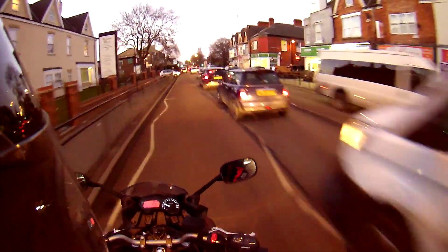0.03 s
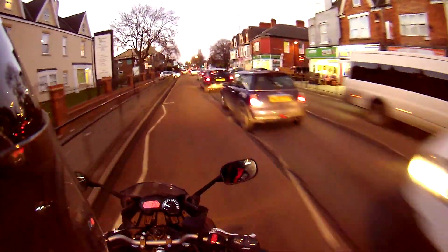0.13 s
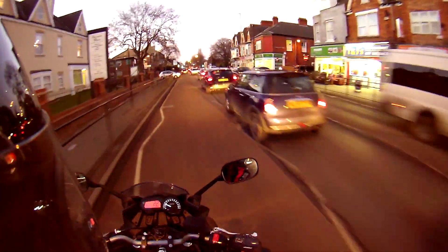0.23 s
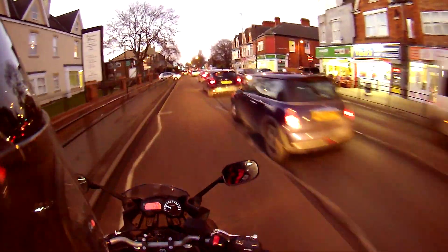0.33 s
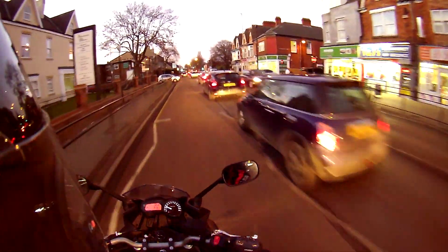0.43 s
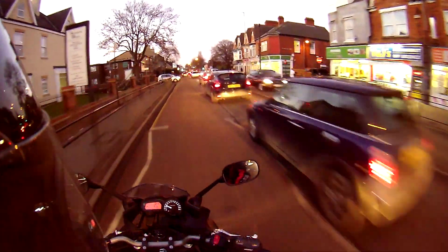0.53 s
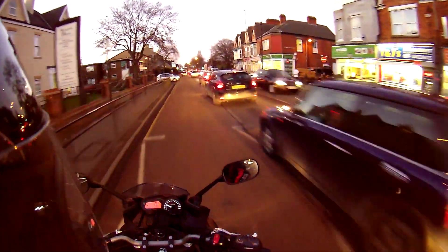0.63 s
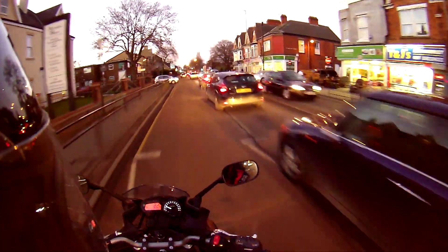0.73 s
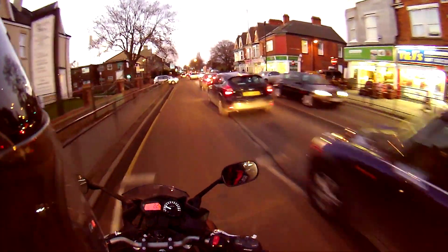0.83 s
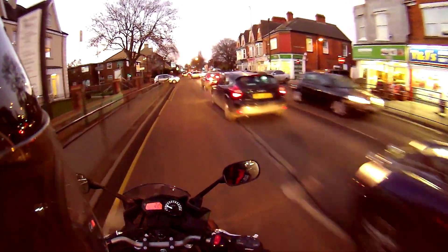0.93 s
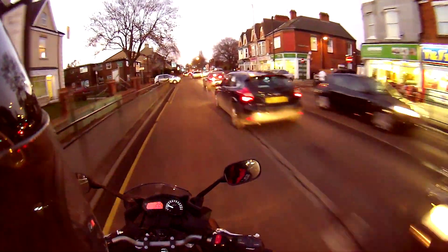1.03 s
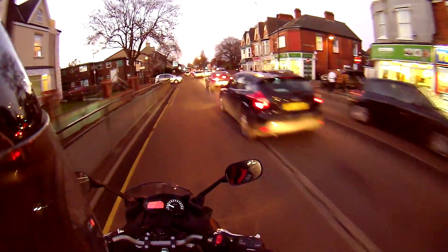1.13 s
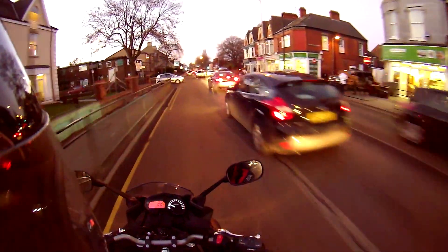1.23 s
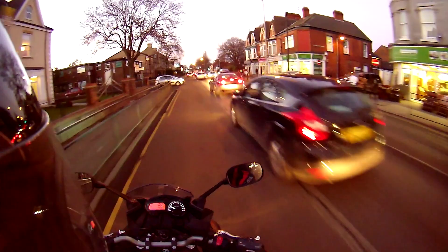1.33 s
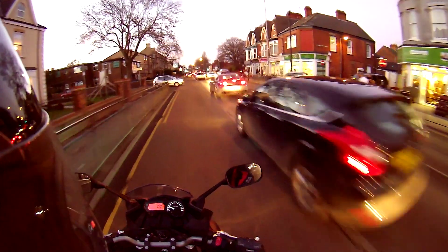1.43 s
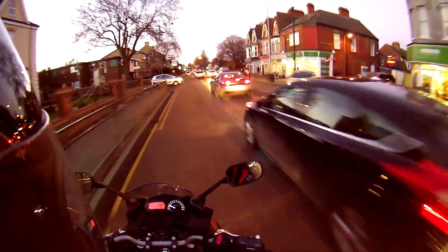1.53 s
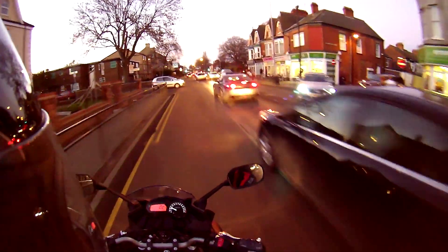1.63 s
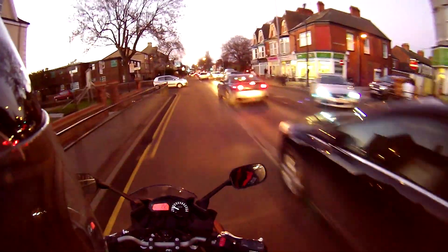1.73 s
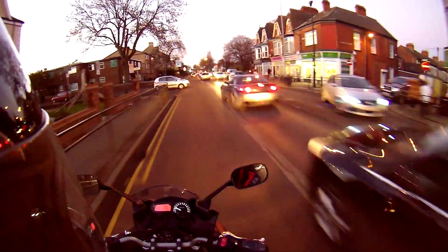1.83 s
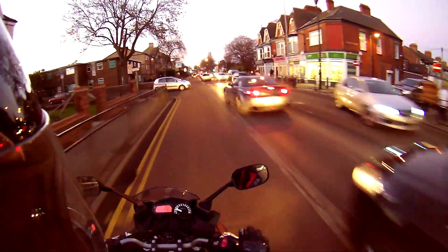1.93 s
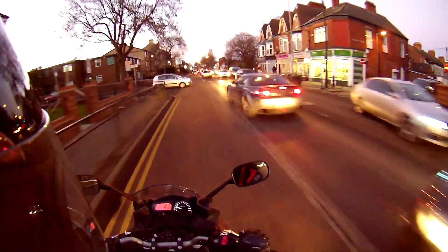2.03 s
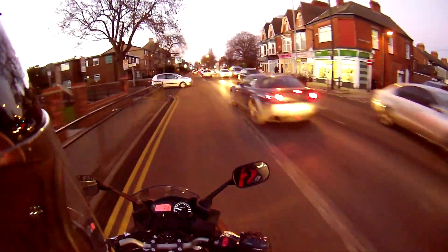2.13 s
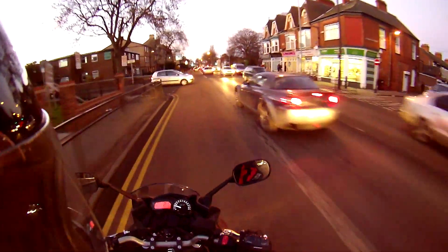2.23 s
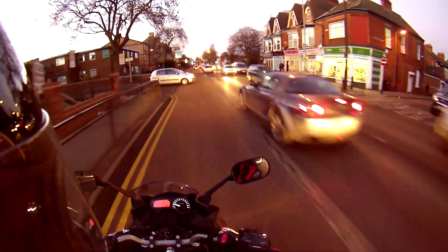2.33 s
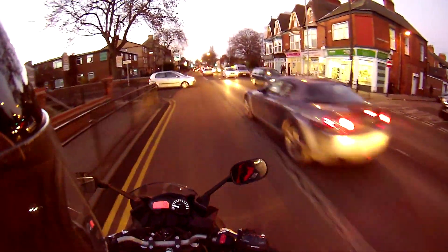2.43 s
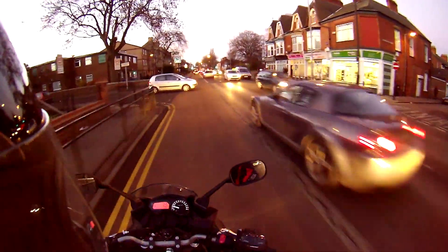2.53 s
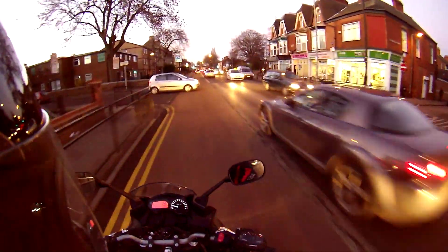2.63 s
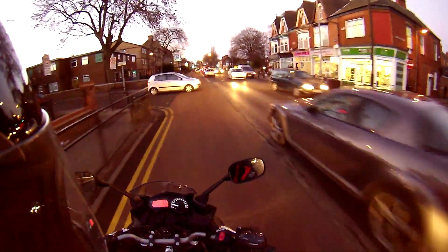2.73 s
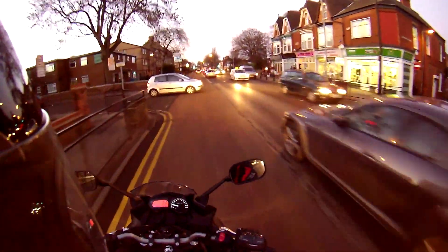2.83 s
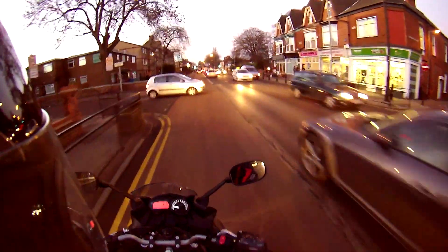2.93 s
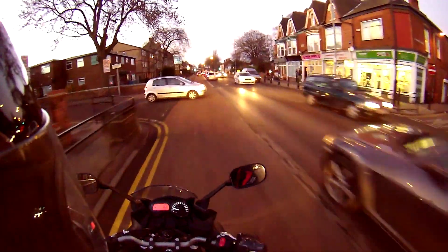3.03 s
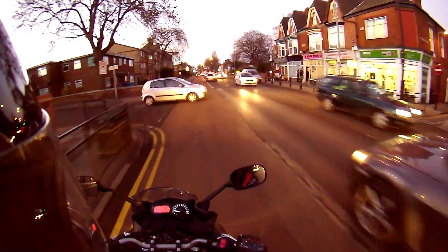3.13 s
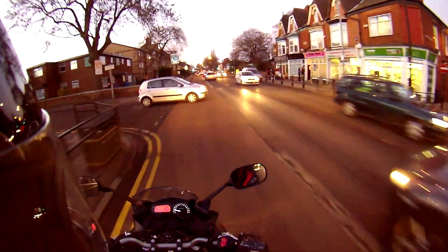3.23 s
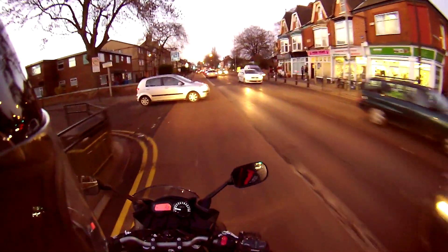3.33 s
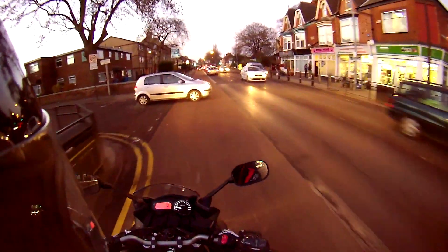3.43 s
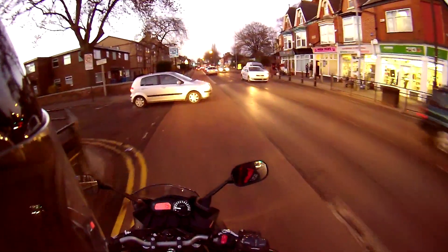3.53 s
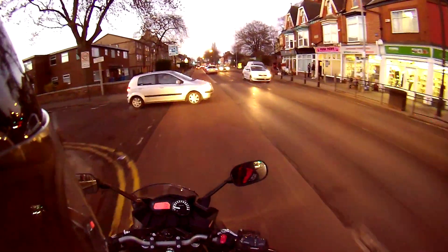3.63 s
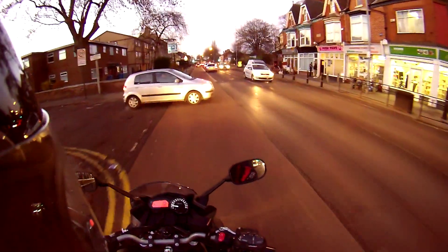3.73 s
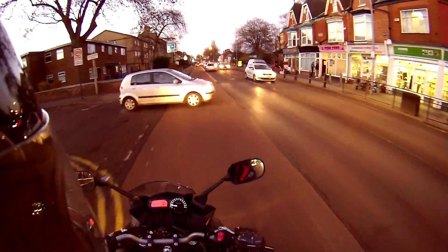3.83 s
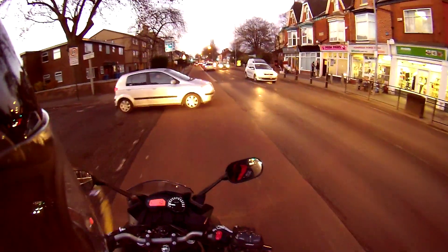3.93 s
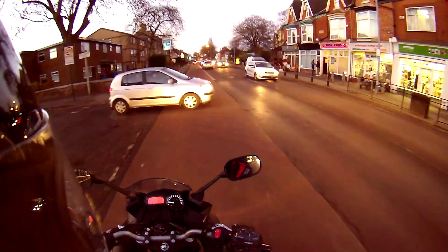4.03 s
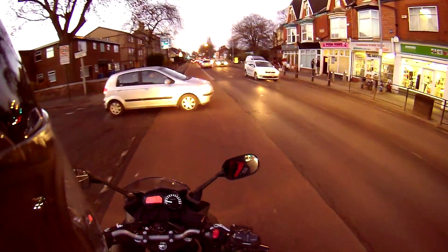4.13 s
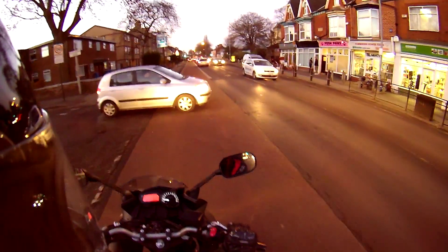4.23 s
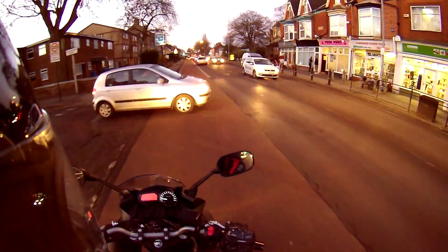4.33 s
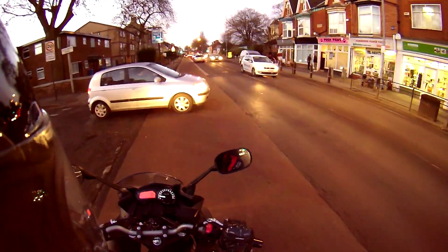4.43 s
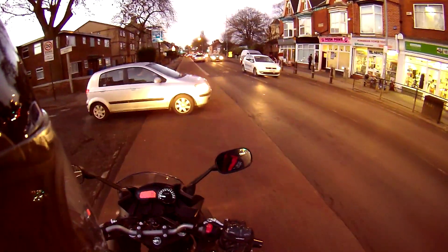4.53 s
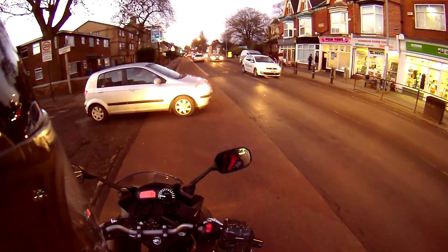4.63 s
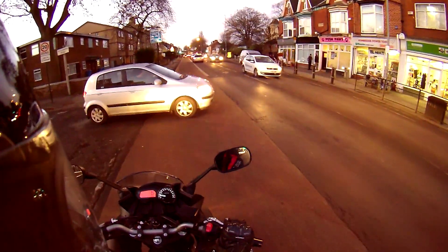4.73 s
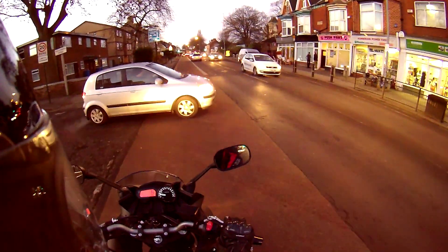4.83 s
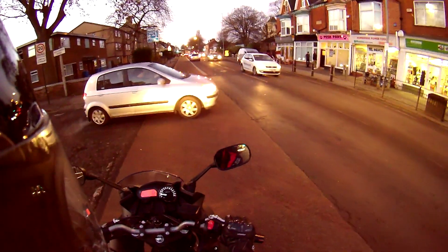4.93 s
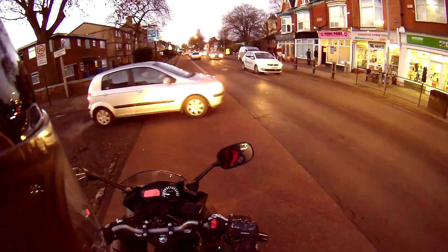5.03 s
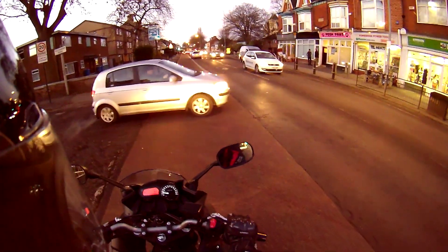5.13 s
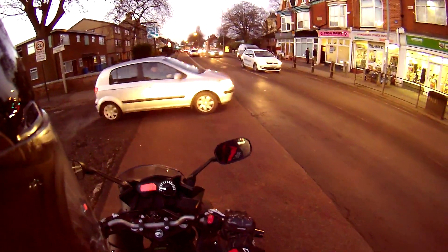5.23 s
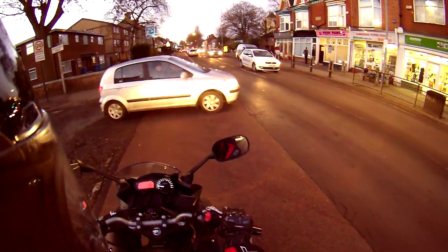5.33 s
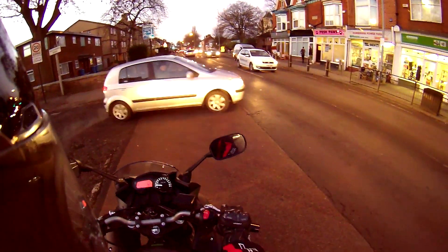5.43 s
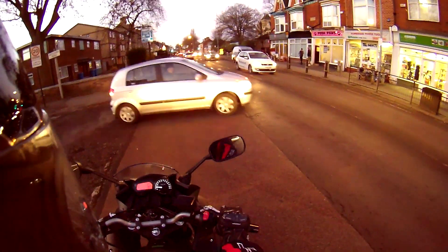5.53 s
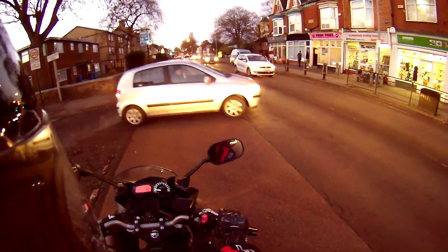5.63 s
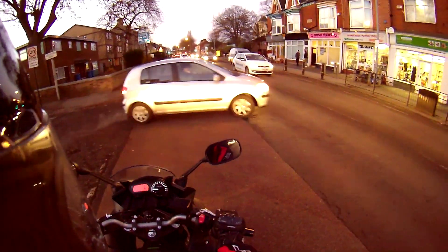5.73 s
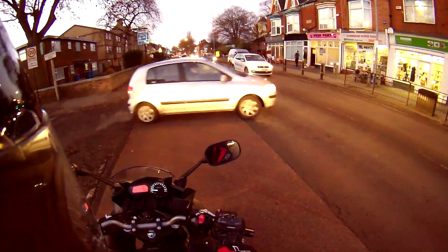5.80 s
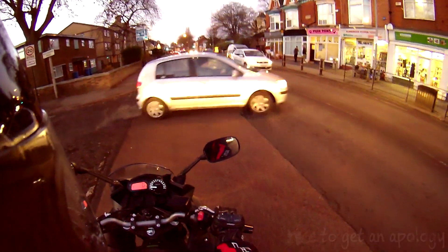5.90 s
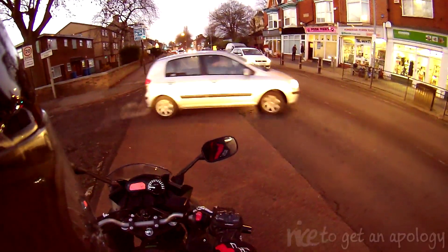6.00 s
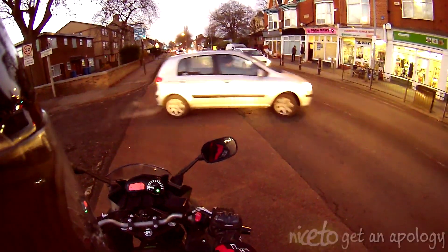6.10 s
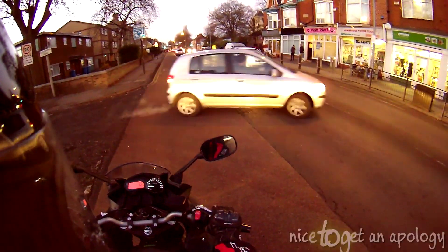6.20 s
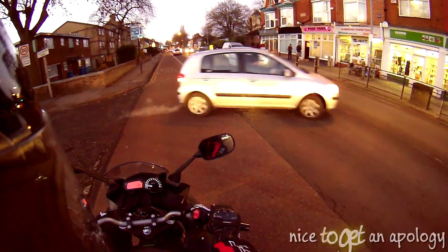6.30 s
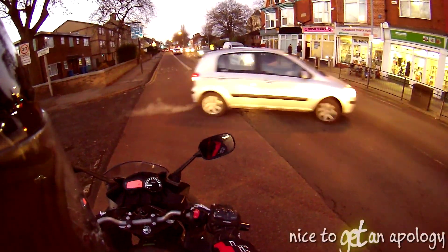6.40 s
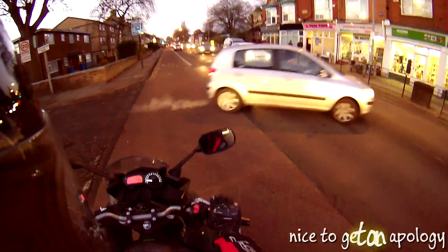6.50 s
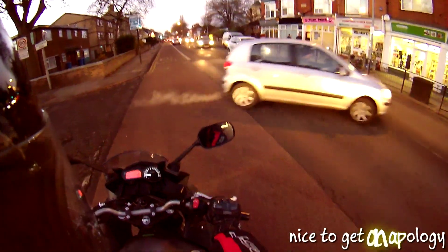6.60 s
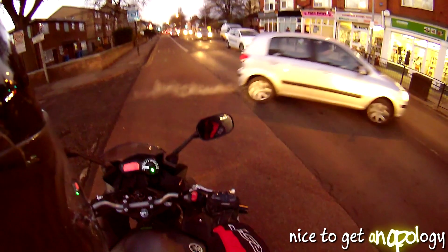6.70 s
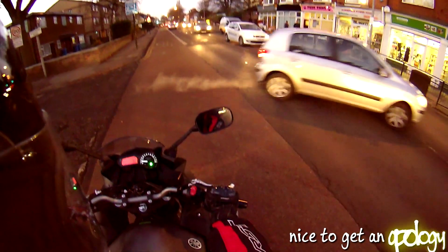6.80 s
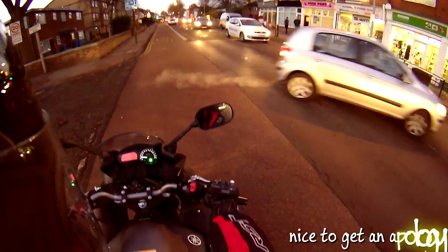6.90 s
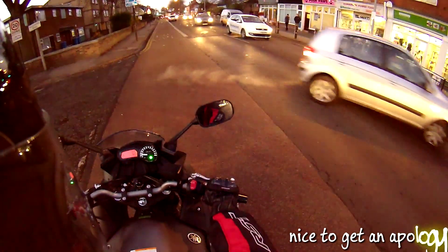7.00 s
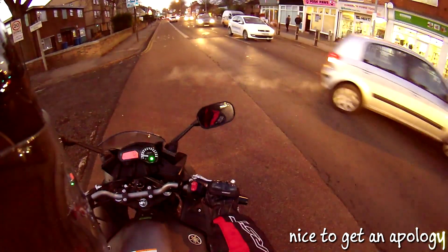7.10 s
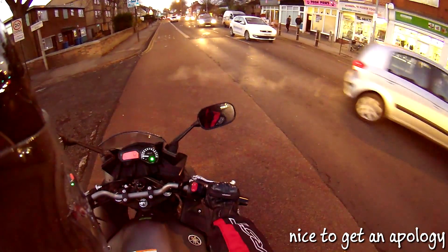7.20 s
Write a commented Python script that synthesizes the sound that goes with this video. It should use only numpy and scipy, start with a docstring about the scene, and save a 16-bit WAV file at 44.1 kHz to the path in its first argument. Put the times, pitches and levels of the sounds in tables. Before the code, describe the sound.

Wind rumbles over a running motorcycle engine; its horn blares for a second, and the engine sinks to a steady idle.

```python
"""Motorcycle and horn in town

A four-cylinder motorcycle passes a line of cars, heard from the rider's helmet: firing pulses drive
exhaust, casing and air box, the chain hums and the tyres roar. The rider shuts the throttle and sounds
the disc horn, a hammered diaphragm, for a second at a car that pulls out ahead. Turbulent wind buffets
the microphone until the bike slows; the engine sinks to idle, with a brief squeal and a few clicks."""
import sys
import numpy as np
from scipy import signal
from scipy.fft import rfft, irfft, next_fast_len
from scipy.io import wavfile
from scipy.ndimage import uniform_filter1d

SR = 44100
rng = np.random.default_rng(int(sys.argv[2]) if len(sys.argv) > 2 else 0)


def transcribe(signal):
    """Save signal, clipped to [-1, 1], as a 16-bit WAV file at the path in sys.argv[1]."""
    frames = np.atleast_2d(signal).T
    limited = np.clip(frames, -1, 1)
    pcm = np.round(limited * 32767).astype(np.int16)
    wavfile.write(sys.argv[1], SR, pcm)


N = 320166
T = np.arange(N) / SR
HORN_ON_S, HORN_OFF_S, HORN_HZ = 1.656, 2.578, 394.65

# road speed of the bike: t/s, v/(m/s)
ROAD_SPEED = [(0, 9.5), (1, 10), (1.5, 10), (2, 10), (2.8, 7), (3.6, 4), (4.4, 0), (5.6, 4)]


def gain_of(db):
    """Amplitude ratio of a level in decibels."""
    return 10 ** (np.asarray(db) / 20)


def unit_rms(x):
    """The signal normalised to rms 1."""
    return x / np.sqrt(np.mean(x ** 2) + 1e-20)


def curve(points):
    """Linear interpolation of (t/s, value) points at every sample."""
    return np.interp(T, *np.transpose(points))


def level_at(spectrum, hz):
    """Interpolation of (f/Hz, level/dB) points in log frequency."""
    f, db = np.transpose(spectrum)
    return np.interp(np.log(hz + 1), np.log(f + 1), db)


def noise(shape):
    """White noise filtered to the amplitude spectrum shape(f/Hz), at rms 1."""
    size = next_fast_len(N)
    spectrum = rfft(rng.standard_normal(size)) * shape(np.fft.rfftfreq(size, 1 / SR))
    return unit_rms(irfft(spectrum, size)[:N])


def band(hz, width):
    """Response of a steep-sided resonance to white noise, at rms 1."""
    return noise(lambda f: (1 + ((f - hz) / width) ** 2) ** (-3 / 2))


def drift(rate_hz, t=T):
    """Random modulation of rms 1, lying mostly below rate_hz."""
    knots = rng.standard_normal(4000)
    return unit_rms(np.interp(t * rate_hz * 2, np.arange(len(knots)), knots))


def gate(start, end, rise, fall):
    """Exponential growth from start and decay from end; rise and fall are time constants in s."""
    return (1 - np.exp(-np.maximum(T - start, 0) / rise)) * np.exp(-np.maximum(T - end, 0) / fall)


def swell(peak_s, half_length_s):
    """Envelope of a passing source, rising to 1 at peak_s and falling again."""
    return 1 / (1 + ((T - peak_s) / half_length_s) ** 4)


def pace(cruise_m_per_s=9.6):
    """Ratio of road speed to cruising speed."""
    return curve(ROAD_SPEED) / cruise_m_per_s


def engine():
    """Periodic combustion drives exhaust, air box, casing and gears at multiples of the crank rate."""
    # firing rate at cruise, running down and at idle: t/s, f/Hz
    firing_rate = [(0, 83.9), (.4, 81.8), (1.4, 81.4), (1.7, 80), (2.1, 74), (2.35, 63), (2.6, 57.2),
                   (3.1, 54.3), (3.4, 48.2), (4.5, 48.1), (4.7, 49.3), (5, 46.2), (6.1, 45.8),
                   (7.26, 45.15)]
    firing_hz = curve(firing_rate)
    exhaust_db, casing_db, box_db = engine_levels(firing_hz)
    firings = np.cumsum(firing_hz * (1 + .003 * drift(13))) / SR
    load = np.clip((firing_hz - 50) / 26, 0, 1)
    note = gain_of(exhaust_db) * exhaust(firings, load)
    drone = gain_of(box_db) * air_box(firings, firing_hz)
    clatter = gain_of(casing_db) * casing(firings)
    throb = gain_of(-41.5) * band(hz=54, width=16)  # uneven burning excites the pipe's resonance
    return note + drone + clatter + throb + gears(firings, load)


def engine_levels(firing_hz, idle_hz=47, cruise_hz=82, overrun_hz_per_s=59, clutch_s=3.08, pull_s=.32):
    """Exhaust, casing and air box levels in dB: radiation grows with the revs and dips on the overrun."""
    revs = (firing_hz - idle_hz) / (cruise_hz - idle_hz)
    fall_hz_per_s = uniform_filter1d(-np.gradient(firing_hz) * SR, size=6000)
    overrun = np.clip(fall_hz_per_s / overrun_hz_per_s, 0, 1) ** 2
    clutch = np.clip((T - clutch_s) / pull_s, 0, 1)
    coasting_db = -6.5 * (1 - clutch)  # throttle shut, still in gear: the exhaust is muted
    exhaust_db = (-37.5 + coasting_db) * (1 - revs) - 34.5 * revs - 3.5 * overrun
    casing_db = -48.5 * (1 - revs) - 43.5 * revs - 4 * overrun
    box_db = -48.5 * (1 - revs) - 40 * revs - 8.5 * overrun - 14.5 * clutch
    return exhaust_db, casing_db, box_db


def exhaust(firings, load, flutter=.083, dispersion_rad=.903, half_order_db=-21):
    """A pulse train forms a harmonic series; the silencer delays upper orders, rounding each puff."""
    # exhaust harmonics at cruise and at idle: multiple of the firing rate, relative level/dB
    cruise_orders = [(1, 1), (2, 1.5), (3, -15.5), (4, -15.5), (5, -6.5), (7, -13)]
    idle_orders = [(1, 4.5), (2, 4), (3, 6.5), (4, -11), (5, -16), (6, -11.5), (7, -37.5), (8, -30),
                   (9, -30.5), (10, -30.5), (11, -29.5)]
    note = np.zeros(N)
    for orders, share in ((cruise_orders, load), (idle_orders, 1 - load)):
        lines = [gain_of(db) * np.cos(2 * np.pi * k * firings - dispersion_rad * k ** 2 / 2)
                 for k, db in orders]
        note += share * unit_rms(sum(line * (1 + flutter * drift(11)) for line in lines))
    # unequal cylinders add weak lines between the firing orders
    halves = sum(drift(4) * np.cos(2 * np.pi * ((k + .5) * firings + rng.random())) for k in range(12))
    return note + gain_of(half_order_db) * unit_rms(halves)


def air_box(firings, firing_hz, resonance_hz=499, width_hz=42, odd_gain=.55, flutter=.35):
    """A fixed resonance picks out one crank order after another as the revs fall."""
    crank_hz = firing_hz / 2
    drone = np.zeros(N)
    for k in range(11, 25):
        detuning = (k * crank_hz - resonance_hz) / (width_hz / 2)
        gain = (odd_gain if k % 2 else 1) / (1 + detuning ** 4)
        drone += gain * (1 + flutter * drift(21)) * np.cos(np.pi * k * firings)
    return np.sqrt(2) * drone


def casing(firings, knock=.221, uneven=.083):
    """Resonant noise is amplitude-modulated by each firing, and harder once a crank turn."""
    # resonances of casing and air box: f/Hz, width/Hz, relative level/dB
    resonances = [(412.4, 59, 2), (503, 50, 0), (610, 36, -7.5), (975, 140, -13), (1194, 170, -11),
                  (1400, 330, -10), (1727, 216, -10), (2008, 92, -11), (2980, 540, -20), (4120, 400, -24.5),
                  (5500, 60, -30.5)]
    blows = (1 + knock * np.cos(2 * np.pi * firings)) * (1 + uneven * np.cos(np.pi * firings))
    rattle = sum(gain_of(db) * band(hz, width) for hz, width, db in resonances)
    return unit_rms(rattle) * unit_rms(blows)


def chain(links_per_m=22.5, cruise_db=-53, flutter=.11, speed_power=1.87):
    """Links meet the sprocket at a rate proportional to speed: the hum sinks and fades on slowing."""
    mesh_hz = links_per_m * curve(ROAD_SPEED)
    hum = np.sqrt(2) * np.sin(2 * np.pi * np.cumsum(mesh_hz) / SR) * (1 + flutter * drift(6.4))
    return gain_of(cruise_db) * pace() ** speed_power * hum


def wind(cruise_db=-30.5, breeze_db=-40.5, speed_power=4.1, calm_db_per_octave=-3.5, flicker_db=1):
    """Turbulent pressure on the microphone grows with speed; head wind, breeze and gusts add in power."""
    # gusts of smaller eddies, mostly wakes of cars: t/s, half length/s, level/dB, tilt/(dB/octave)
    gusts = [(0.197, 0.34, -21, -0.5), (0.644, 0.085, -16.5, -1), (.855, 0.078, -15.5, -2.5),
             (1.2, 0.27, -32, -1), (1.567, 0.046, -20.5, -2.5), (2.17, .05, -31.5, 2.5),
             (2.744, 0.077, -22.5, -2.5), (3.158, 0.31, -22.5, 1), (4.155, 0.24, -34.5, -1.5)]
    steady_power = gain_of(breeze_db) ** 2 + (gain_of(cruise_db) * pace() ** speed_power) ** 2
    flows = [(steady_power, calm_db_per_octave)]
    flows += [((gain_of(db) * swell(s, half_length)) ** 2, tilt) for s, half_length, db, tilt in gusts]
    total_power = sum(power for power, tilt in flows)
    mean_tilt = sum(power * tilt for power, tilt in flows) / total_power
    return eddies(mean_tilt) * np.sqrt(total_power) * gain_of(-flicker_db * drift(7))


def eddies(db_per_octave):
    """Turbulence at a steady rms of 1; smaller eddies tilt its spectrum upward from 20 to 400 Hz."""
    # spectrum of the buffeting: f/Hz, relative density level/dB
    buffet = [(8, -3), (18, 8), (32, -5), (55, -4), (90, -10), (150, -17.5), (300, -33.5), (600, -43),
              (1500, -82.5), (5000, -110)]
    hz, t, frames = signal.stft(rng.standard_normal(N), SR, nperseg=4096, noverlap=3072)
    octaves = np.log2(np.clip(hz, 20, 400) / 40)
    shape_db = level_at(buffet, hz)[:, None] + octaves[:, None] * np.interp(t, T, db_per_octave)
    rumble = unit_rms(signal.istft(frames * gain_of(shape_db), SR, nperseg=4096, noverlap=3072)[1][:N])
    return rumble / np.sqrt(uniform_filter1d(rumble ** 2, size=7000) + 1e-9)


def tyre_roar(treble_db):
    """Rolling contact radiates broadband noise; a shelf reaches treble_db at 3.5 kHz."""
    # spectrum of tyres on the road: f/Hz, relative density level/dB
    spectrum = [(60, 6.5), (200, 5), (450, -5), (620, -6), (850, -12), (1200, -12), (1550, -21.5),
                (1900, -20), (2400, -20), (3100, -26), (4200, -29.5), (5500, -32), (8000, -39.5),
                (12000, -53.5)]
    return noise(lambda f: gain_of(level_at(spectrum, f) + treble_db * np.clip((f - 2000) / 1500, 0, 1)))


def traffic(cruise_db=-37.5, distant_db=-47.5, flicker_db=.8, speed_power=1.5):
    """The bike's tyre noise follows a power law of speed, over distant traffic and passing cars."""
    # tyre sizzle of the nearest cars: t/s, half length/s, f/Hz, width/Hz, level/dB
    passes = [(0.453, .3, 1880, 201, -59.5), (1.09, 0.26, 2436, 150.3, -52), (2.13, .13, 1250, 343, -57),
              (3.008, 0.34, 1450, 694, -58), (6.1, .7, 2006, 381, -64), (6.628, .13, 2900, 452, -66.5)]
    own = gain_of(cruise_db) * pace() ** speed_power * tyre_roar(treble_db=-1)
    distant = gain_of(distant_db) * tyre_roar(treble_db=-.5)
    tyres = (own + distant) * gain_of(flicker_db * drift(19))
    for s, half_length, hz, width, db in passes:
        tyres += gain_of(db) * band(hz, width) * swell(s, half_length)
    return tyres


def horn(overtones_db=-17, diaphragm_db=-21.5):
    """Forced vibration: a buzzer hammers a diaphragm and its steel disc; both ring on after release."""
    drive = gate(HORN_ON_S, HORN_OFF_S, .0022, .0032)
    sounding = (T >= HORN_ON_S) & (T < HORN_OFF_S + .05)
    overtones = np.zeros(N)
    overtones[sounding] = gain_of(overtones_db) * disc_overtones(T[sounding])
    return overtones * drive + gain_of(diaphragm_db) * diaphragm() + disc_ring(drive)


def diaphragm(free_hz=374, decay_s=.071, release_db=-.5):
    """Driven, the diaphragm swings at the strike rate; released, it dies away at its natural pitch."""
    held = T < HORN_OFF_S
    cycles = np.cumsum(np.where(held, HORN_HZ, free_hz)) / SR
    dying = gain_of(release_db) * np.exp(-((T - HORN_OFF_S) / decay_s) ** 2)
    swing = gate(HORN_ON_S - .008, HORN_OFF_S, .0051, 1)  # it moves before the first strike
    return np.sqrt(2) * swing * np.where(held, 1, dying) * np.cos(2 * np.pi * cycles)


def disc_overtones(t, sway_db=1, shake_hz=63, roughness=.156, dulling_db=3, sag_hz=9):
    """Periodic impacts on the disc give a harmonic series, sounded from the second harmonic up."""
    # horn spectrum: harmonic number, relative level/dB
    harmonics = [(1, -1.5), (2, -19.5), (3, -26), (4, -21), (5, -34.5), (6, -6), (7, -10.5), (8, 2),
                 (9, -15.5), (10, -24.5), (11, -25), (12, -21), (13, -22.5), (14, -40), (15, -40),
                 (16, -35.5), (17, -28), (18, -47), (19, -35), (20, -36), (21, -46), (22, -36), (23, -45),
                 (24, -38), (25, -38.5), (26, -31), (27, -54.5), (28, -39), (29, -52.5), (30, -47.5),
                 (31, -53.5), (32, -56), (33, -53), (34, -42), (35, -38.5), (36, -52), (37, -55),
                 (38, -46.5), (39, -51)]
    # strikes come a little early or late, which roughens the top partials most
    shake = .001 * np.sin(2 * np.pi * shake_hz * t + drift(5, t))
    jitter = .0013 * drift(130, t)
    lag = sag_hz * np.maximum(t - HORN_OFF_S + .007, 0)  # the last strikes fall behind
    cycles = HORN_HZ * t + shake + jitter - lag
    from_middle = (t - HORN_ON_S) / (HORN_OFF_S - HORN_ON_S) - .5
    # minimum phase puts the ringing after each blow
    gains = gain_of([db for k, db in harmonics])
    log_gain = np.log(np.r_[gains[0] / 10, gains])
    phases = -signal.hilbert(np.r_[log_gain, log_gain[:0:-1]]).imag
    tone = np.zeros(len(t))
    for k, gain in enumerate(gains[1:], start=2):
        # weak partials sway as the bike moves, and rasp as the strikes vary
        weakness = 1 / (1 + (gain * 10) ** 2)
        colour_db = sway_db * (.067 + weakness) * drift(2.2, t)
        colour_db -= dulling_db * from_middle * min(k / 20, 1)
        rasp = 1 + roughness * (.032 + weakness) * drift(140, t)
        tone += gain * gain_of(colour_db) * rasp * np.cos(2 * np.pi * k * cycles + phases[k])
    return unit_rms(tone)


def disc_ring(drive):
    """Uneven strikes, the first and last most of all, excite the disc's damped natural modes."""
    # modes of the disc and its bracket: f/Hz, t60/s, level/dB
    modes = [(1910, .5, -69.5), (2430, .3, -58), (2700, 0.277, -54.5), (2824, 0.22, -49), (3050, .12, -55),
             (3185, 0.18, -44), (3240, 0.23, -39.5), (3363, .25, -44.5), (3390, .06, -47.5),
             (3660, .07, -44.5), (3767, .35, -52), (3675, 0.17, -42.5), (4125, .04, -59.5),
             (4300, 0.21, -53.5)]
    t = T[:SR]
    response = np.zeros(SR)
    for hz, t60, db in modes:
        mode = np.exp(-np.log(1000) * t / t60) * np.sin(2 * np.pi * (hz * t + rng.random()))
        response += gain_of(db) * mode / np.linalg.norm(mode)
    first_blow = 3 * gate(HORN_ON_S, HORN_ON_S, .001, .013)
    last_blow = .92 * gate(HORN_OFF_S - .012, HORN_OFF_S, .0066, .006)
    force = rng.standard_normal(N) * (drive + first_blow + last_blow)
    return signal.fftconvolve(force, response)[:N]


def horn_contact(rasp_db=-53.5, fade_db_per_s=4, bite_db=-33, snap_db=-39):
    """Impact noise: the contact bites as it closes, rasps at each strike and snaps as it lets go."""
    age_s = np.clip(T - HORN_ON_S, 0, 1)
    pulses = (1 + .5 * np.cos(2 * np.pi * HORN_HZ * T)) * gate(HORN_ON_S, HORN_OFF_S, .0025, .025)
    rasp = gain_of(rasp_db - fade_db_per_s * age_s) * band(6500, 5500) * pulses
    bite = gain_of(bite_db) * band(2900, 600) * gate(HORN_ON_S, HORN_ON_S, .001, .012)
    snap = gain_of(snap_db) * band(4400, 2200) * gate(HORN_OFF_S - .007, HORN_OFF_S - .002, .003, .005)
    return rasp + bite + snap


def street(direct, wet_db=-21, t60=.3):
    """Scattering from fairing, road and house fronts adds a weak, short reverberation."""
    t = T[:SR // 2]
    response = rng.standard_normal(len(t)) * (t > .002) * np.exp(-np.log(1000) * t / t60)
    return direct + gain_of(wet_db) * signal.fftconvolve(direct, response / np.linalg.norm(response))[:N]


def far_echo(wet_db=-48, t60=1.04):
    """House fronts ahead reflect strong horn partials, smeared and Doppler-raised by the bike's motion."""
    # returning partials as noise bands: f/Hz, width/Hz, relative level/dB
    partials = [(2500, 50, -23), (2641, 90, -9.5), (3270, 48, -1), (3675, 60, -7)]
    echo = sum(gain_of(db) * band(hz, width) for hz, width, db in partials)
    return gain_of(wet_db) * echo * gate(HORN_ON_S + .05, HORN_OFF_S, .039, t60 / np.log(1000))


def gears(firings, load):
    """Meshing teeth give faint tones locked to the engine at idle, which sink away under load."""
    # gear tones: multiple of the firing rate; peak level/dB of each
    orders = [11, 25]
    levels = [-58.5, -64.5]
    tones = sum(gain_of(db) * (1 + .5 * drift(6)) * np.cos(2 * np.pi * k * firings)
                for k, db in zip(orders, levels))
    return tones * (1 - load) ** 4


def clicks():
    """Impacts in levers and gearbox give noise bursts that decay exponentially."""
    # impacts: t/s, f/Hz, width/Hz, level/dB before the envelope, decay time/s
    impacts = [(3.525, 4300, 4500, -56, 0.017), (4.507, 2088, 402, -58, .006),
               (4.995, 1990, 400.1, -52.5, 0.016), (6.026, 1300, 1200, -48, 0.0034),
               (6.085, 3500, 1200, -54.5, 0.0063), (6.088, 7570, 1213, -73, .008),
               (6.121, 4000, 3998, -60, 0.0055), (6.553, 6000, 5000, -67, 0.0034)]
    return sum(gain_of(db) * band(hz, width) * gate(s, s + .0021, .00076, decay)
               for s, hz, width, db, decay in impacts)


def brake_squeal(start_s=5.03, end_s=5.38):
    """Friction briefly excites narrow resonances of the brake."""
    # brake resonances: f/Hz, width/Hz, level/dB
    resonances = [(4170, 140, -69), (2235, 90, -64.5), (2060, 100, -59.5)]
    squeal = sum(gain_of(db) * band(hz, width) for hz, width, db in resonances)
    return squeal * gate(start_s, end_s, .024, .012)


def crossing_car(nearest_s=6.85, tyres_db=-47):
    """Level falls with distance, so the tyres and engine of a car swell and fade as it crosses ahead."""
    # engine hum: f/Hz, width/Hz, level/dB, half length/s
    hum_bands = [(166.4, 6, -50.5, 1.2), (384, 5.1, -52.5, 0.37)]
    hum = sum(gain_of(db) * band(hz, width) * swell(nearest_s, half_length)
              for hz, width, db, half_length in hum_bands)
    return hum + gain_of(tyres_db) * tyre_roar(treble_db=-9) * swell(nearest_s, half_length_s=.59)


def scene():
    """Superposition: the pressures of all sources add at one microphone."""
    ride = engine() + chain() + wind() + traffic() + crossing_car() + brake_squeal() + clicks()
    return (ride + street(horn() + horn_contact()) + far_echo())[None]


def record(dry, hiss_db=-77, cutoff_hz=15700):
    """The microphone adds white self-noise; the ends are tapered and a low-pass limits the band."""
    tapered = (dry + gain_of(hiss_db) * rng.standard_normal(dry.shape)) * signal.windows.tukey(N, .0015)
    low_pass = signal.firwin(511, cutoff_hz, window=("kaiser", 9), fs=SR)
    return signal.oaconvolve(tapered, low_pass[None], "same")


dry = scene()
out = record(dry)
transcribe(out)
```